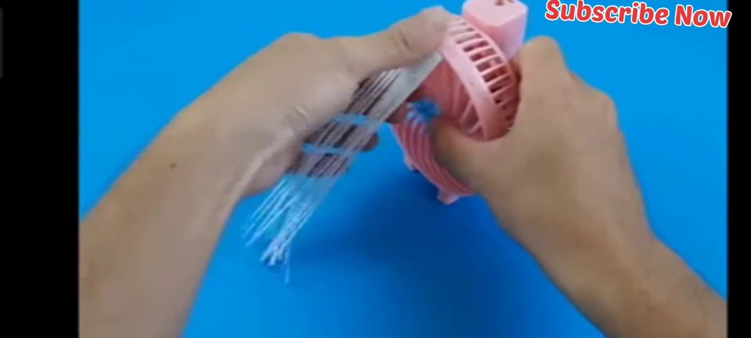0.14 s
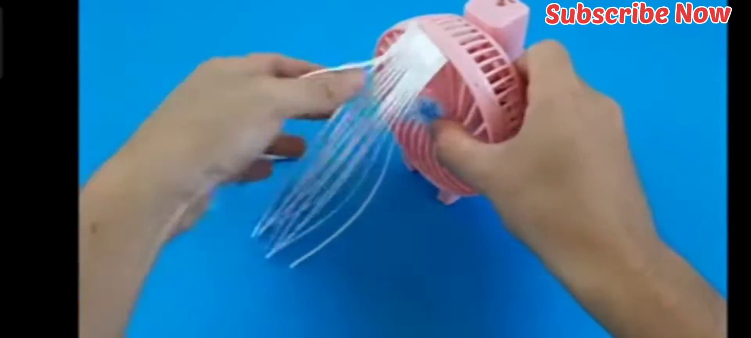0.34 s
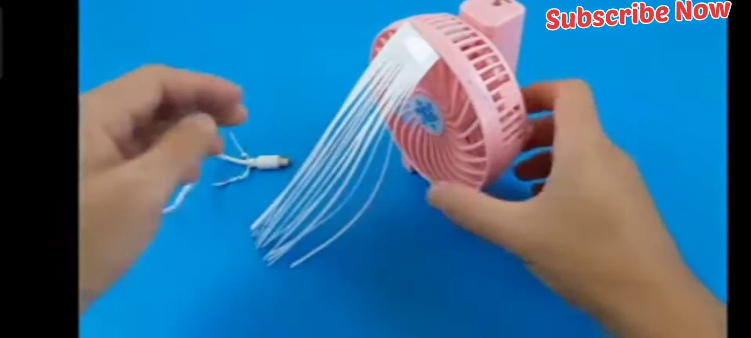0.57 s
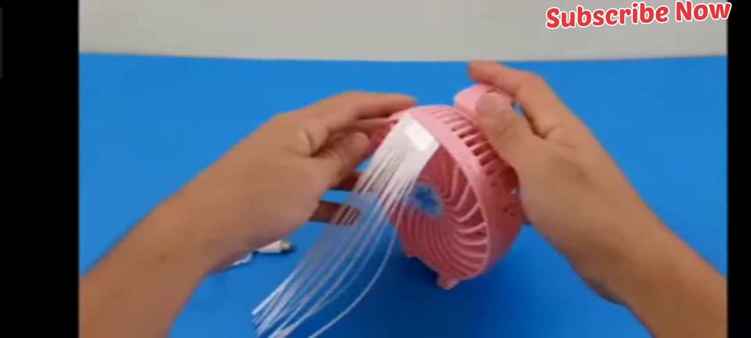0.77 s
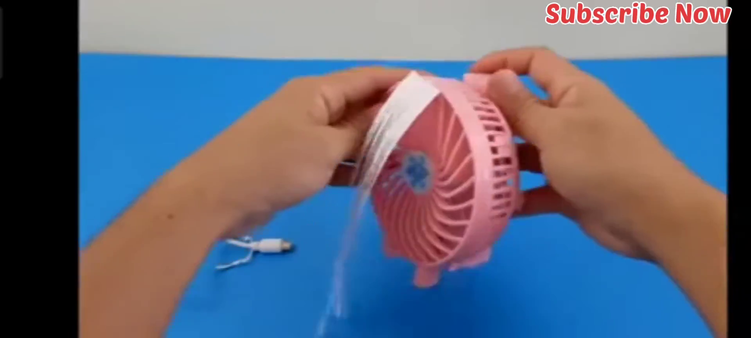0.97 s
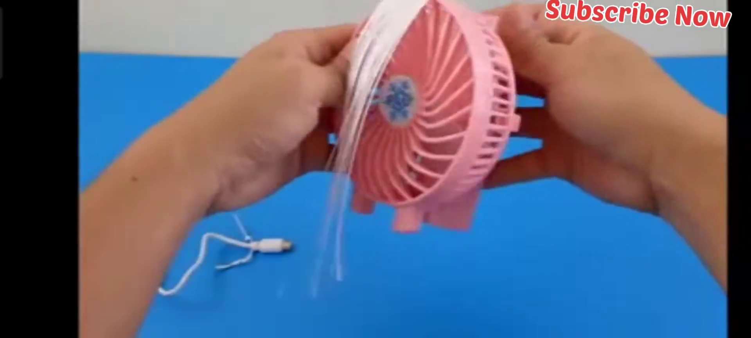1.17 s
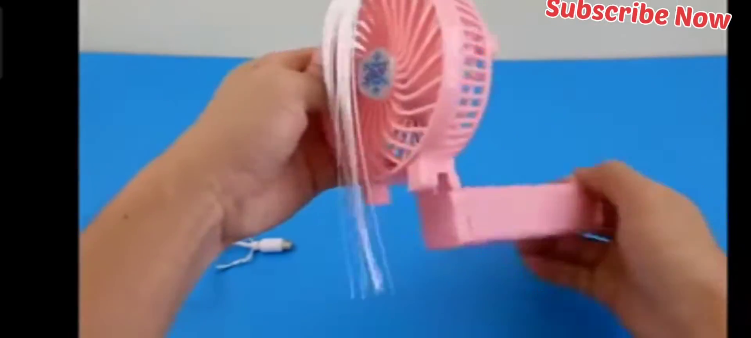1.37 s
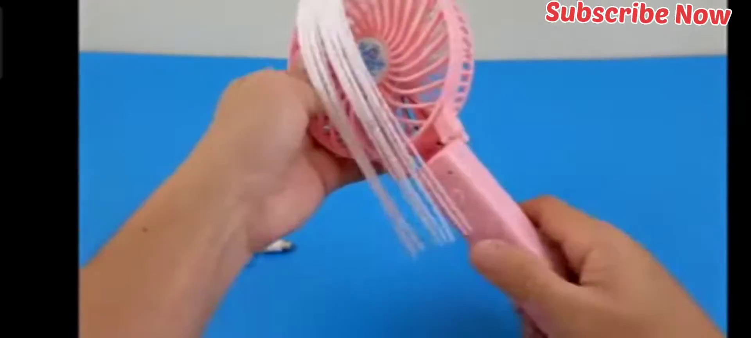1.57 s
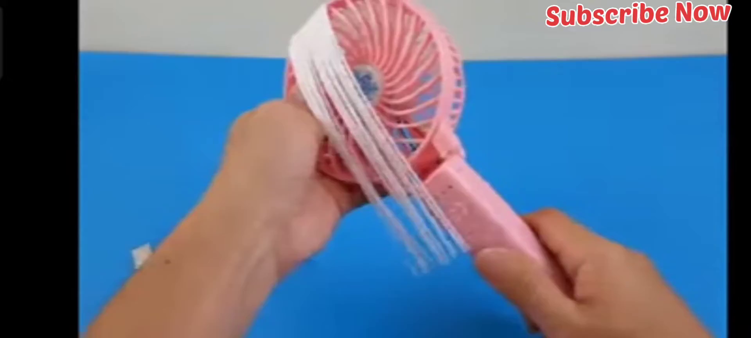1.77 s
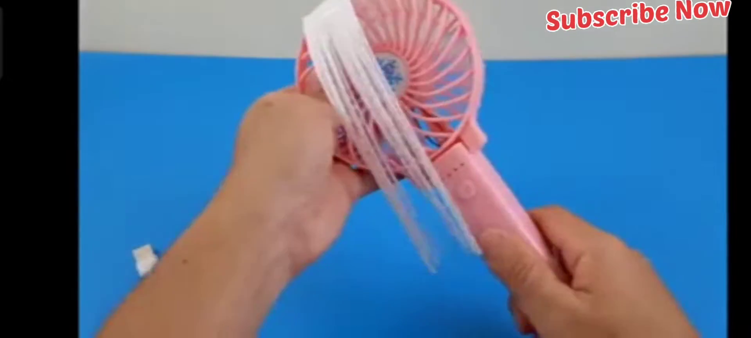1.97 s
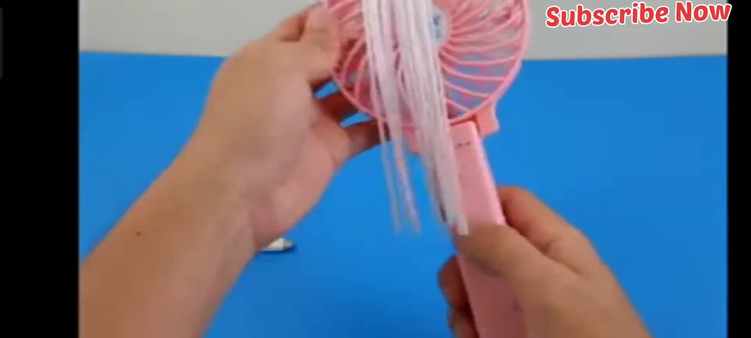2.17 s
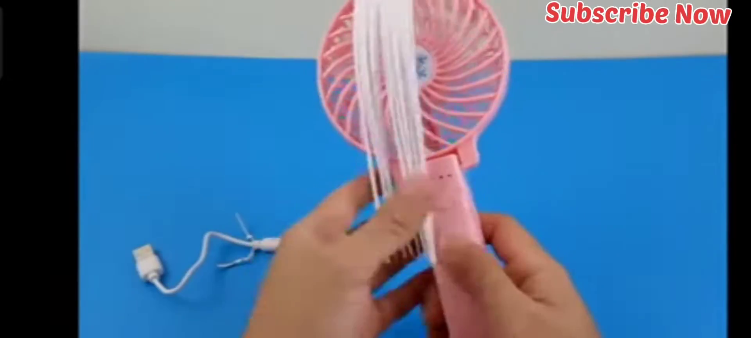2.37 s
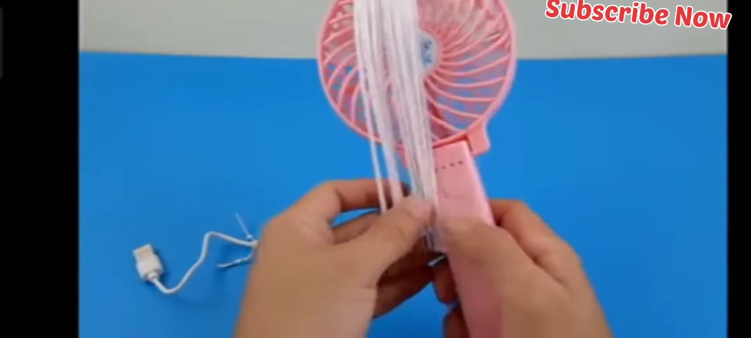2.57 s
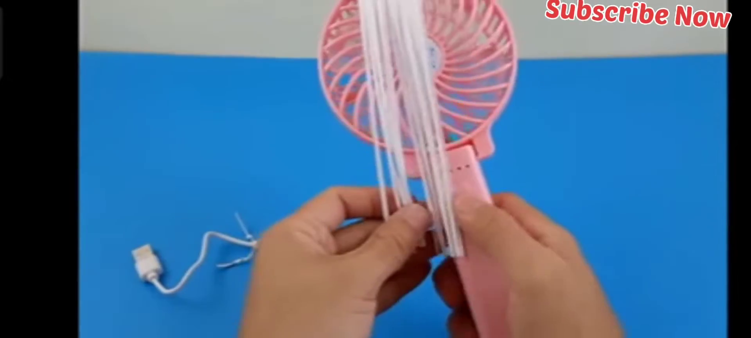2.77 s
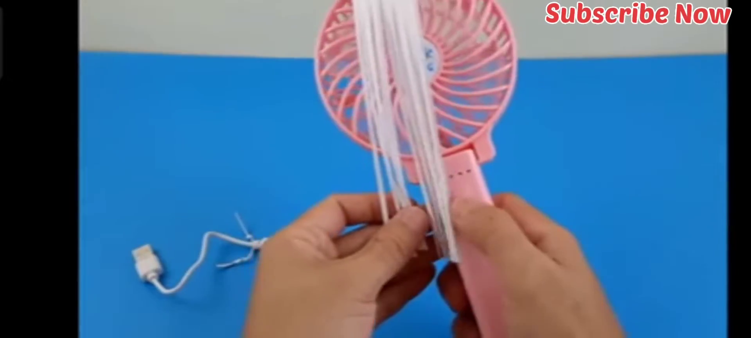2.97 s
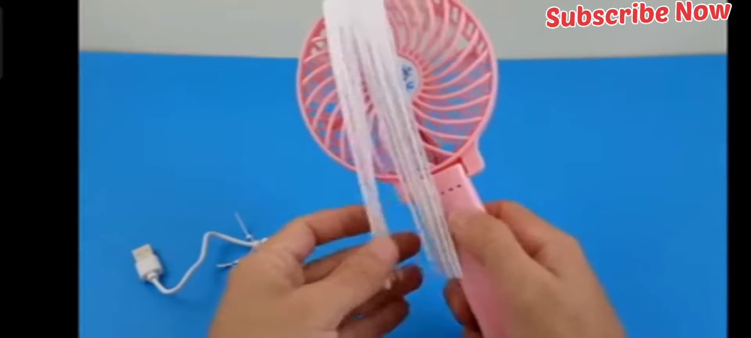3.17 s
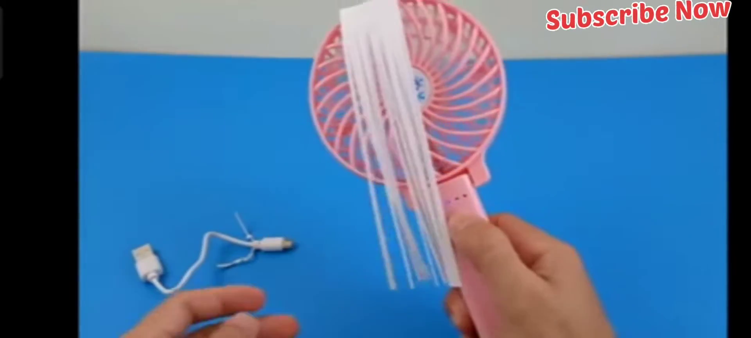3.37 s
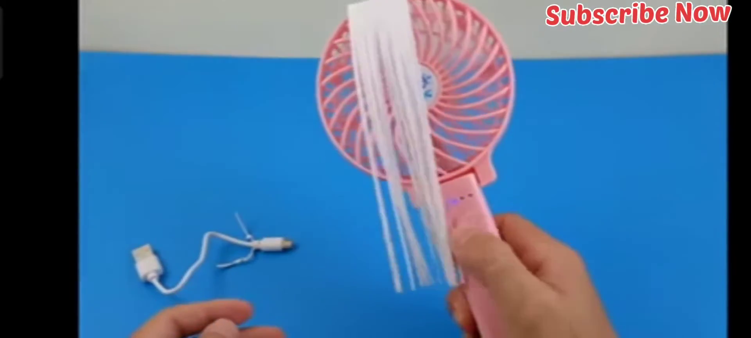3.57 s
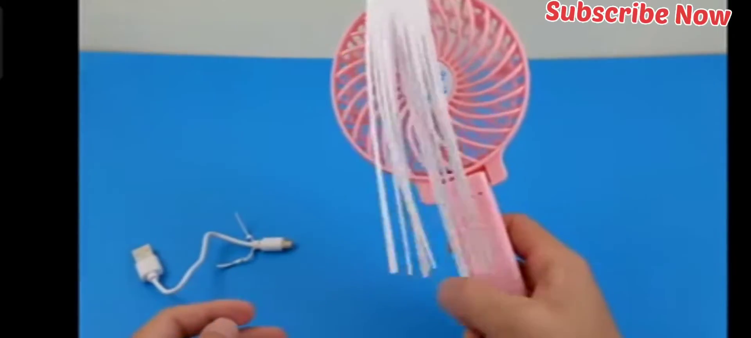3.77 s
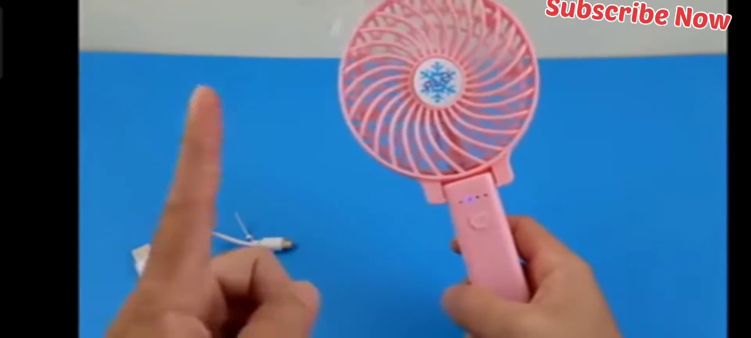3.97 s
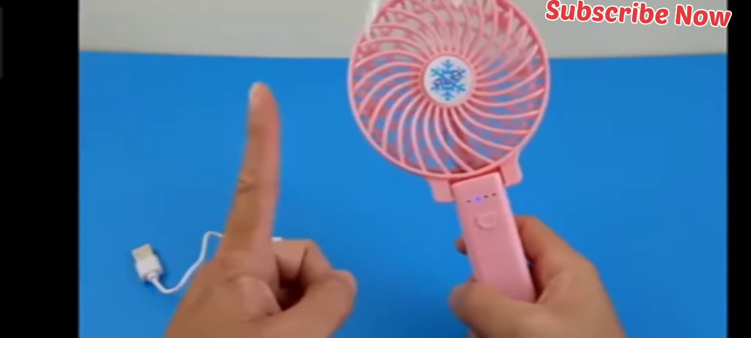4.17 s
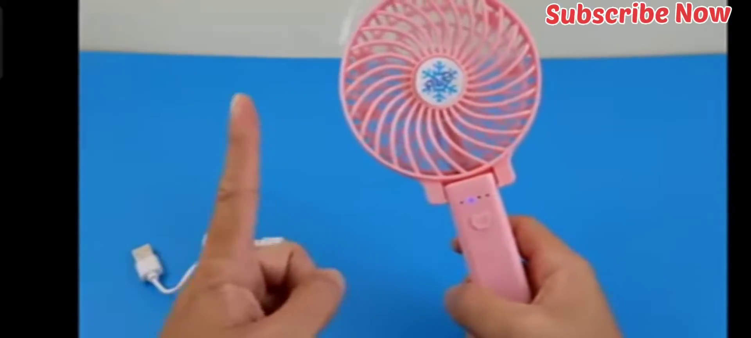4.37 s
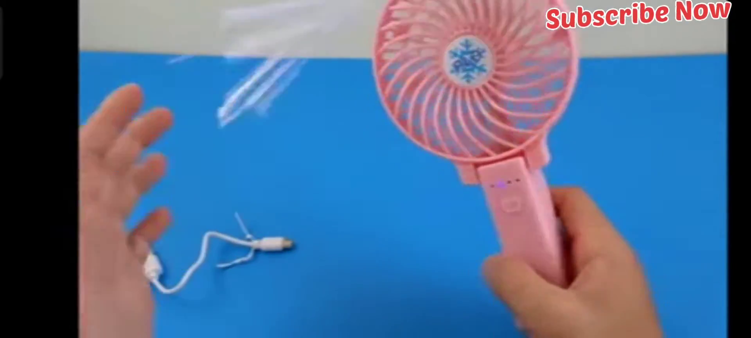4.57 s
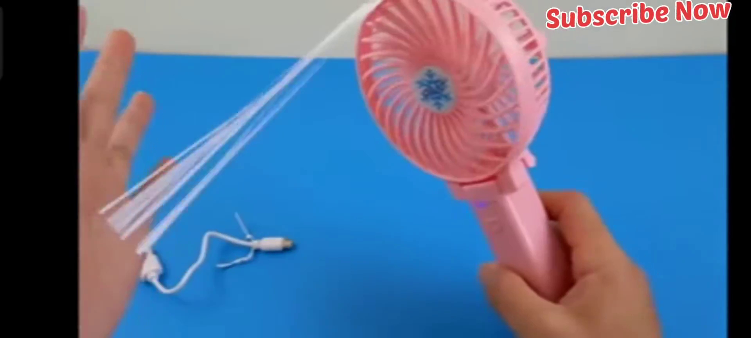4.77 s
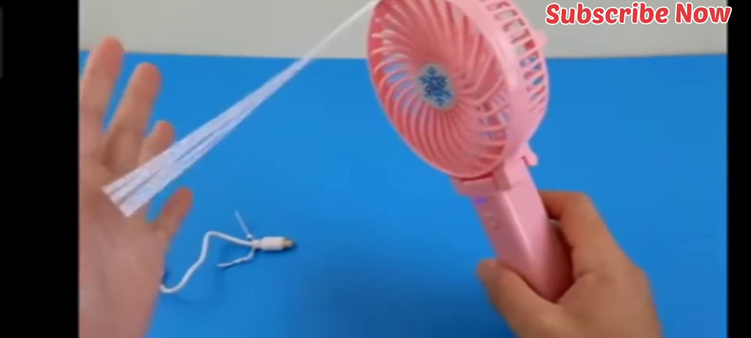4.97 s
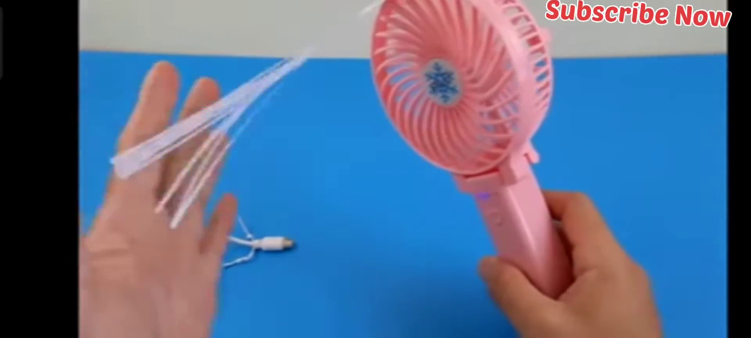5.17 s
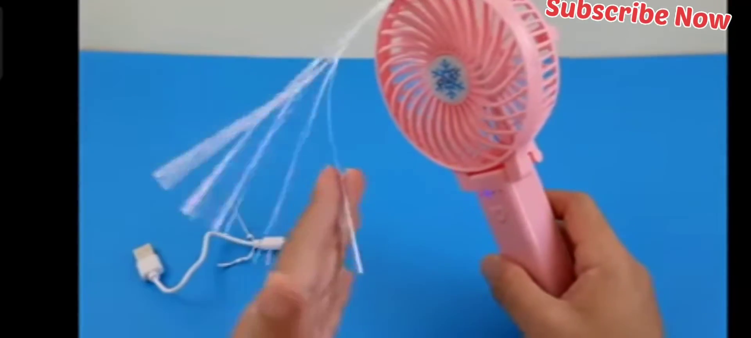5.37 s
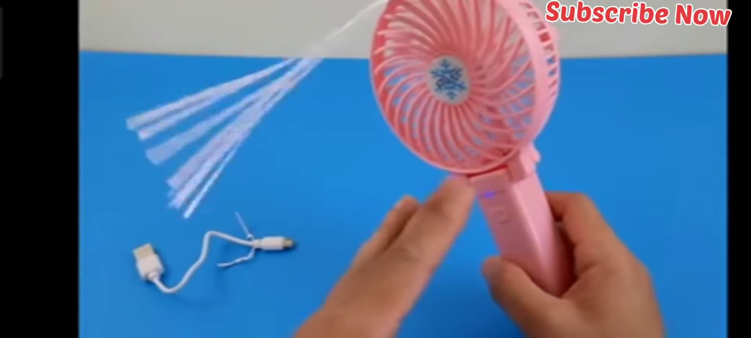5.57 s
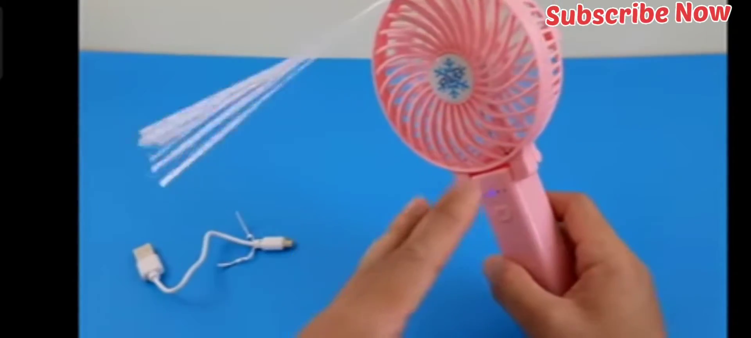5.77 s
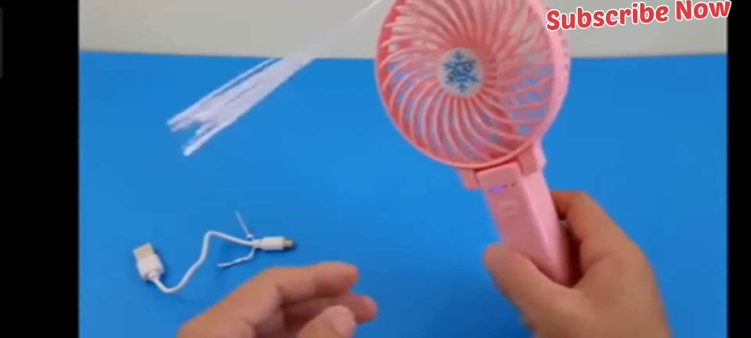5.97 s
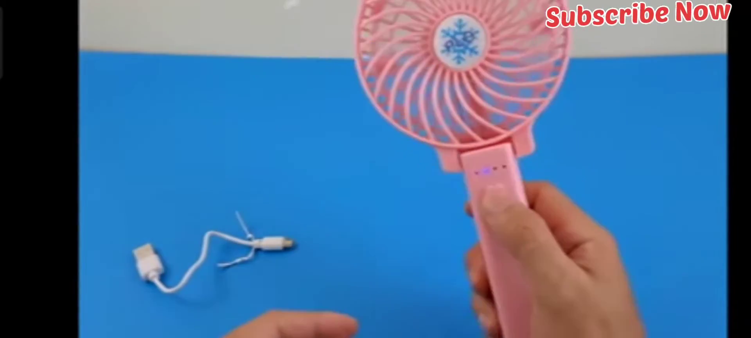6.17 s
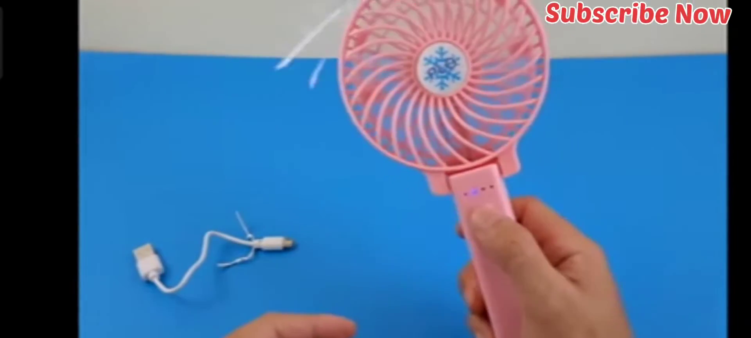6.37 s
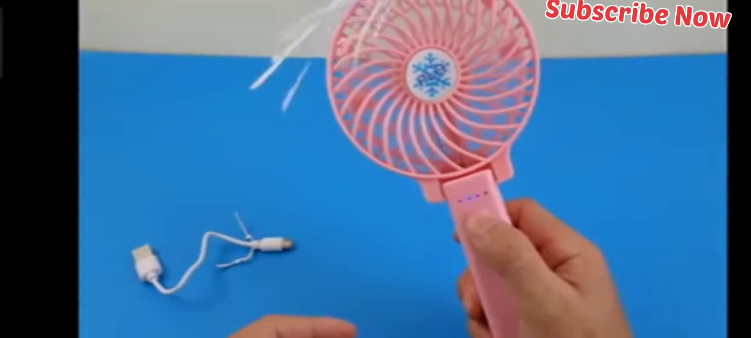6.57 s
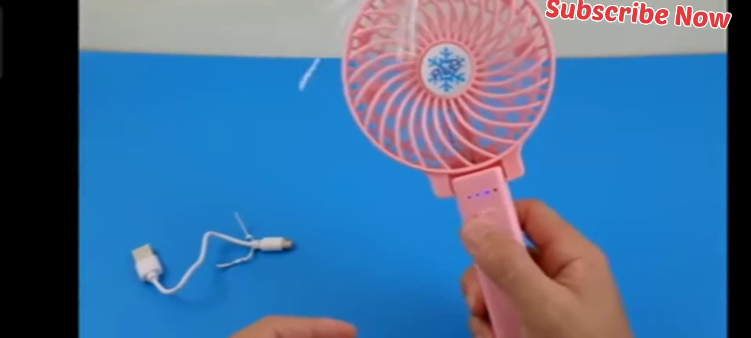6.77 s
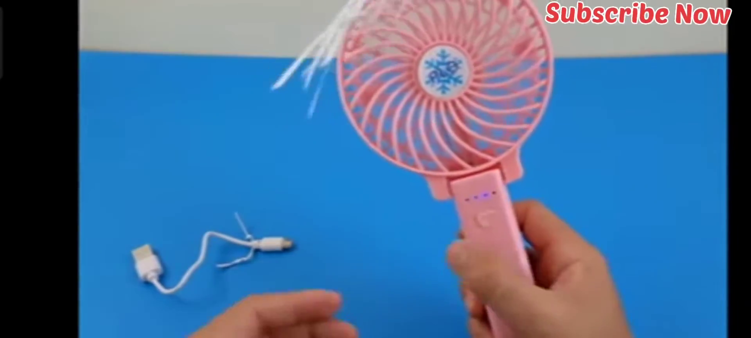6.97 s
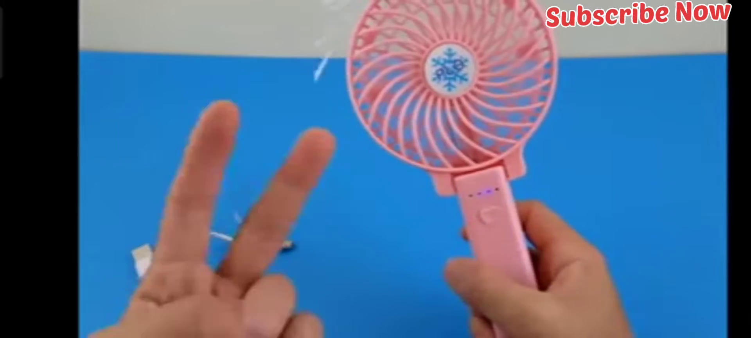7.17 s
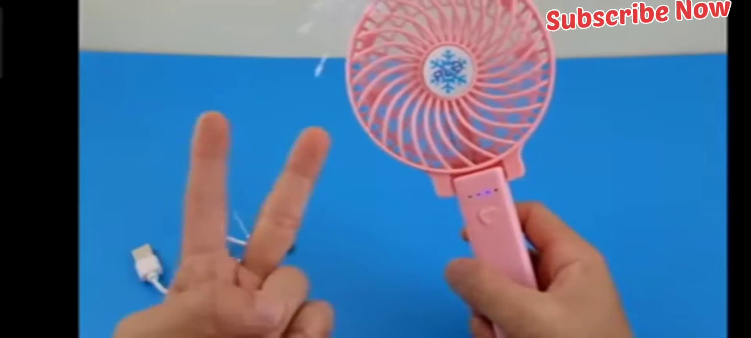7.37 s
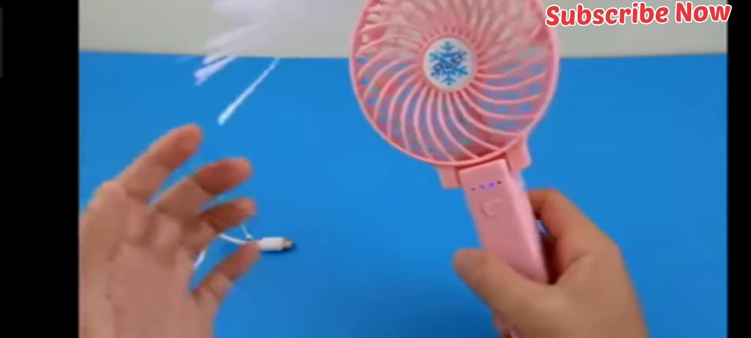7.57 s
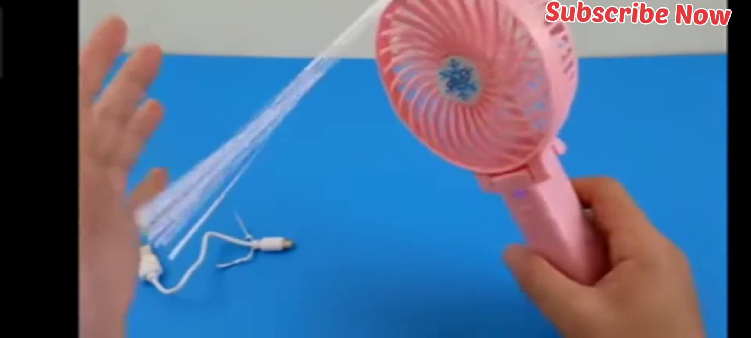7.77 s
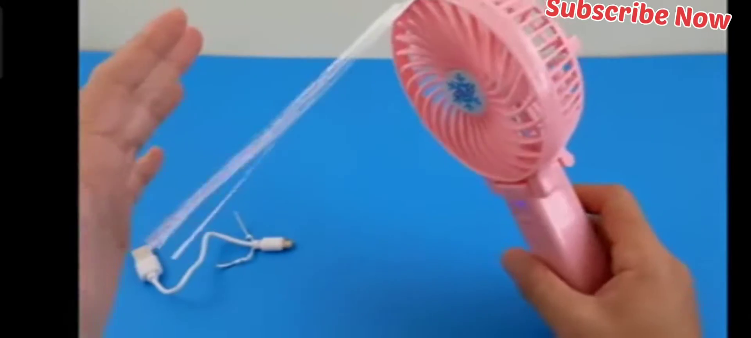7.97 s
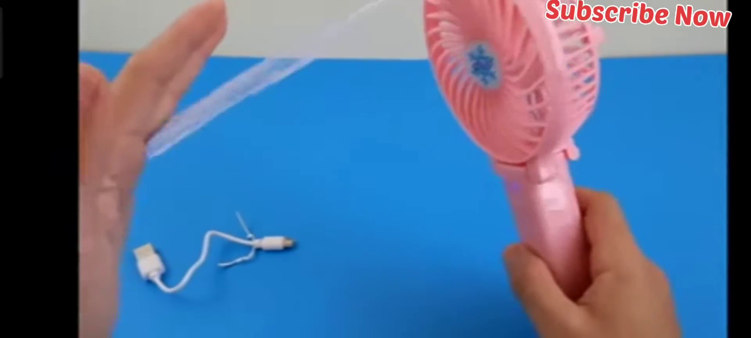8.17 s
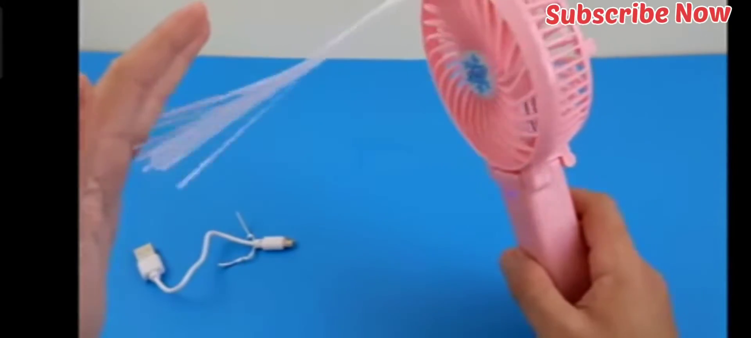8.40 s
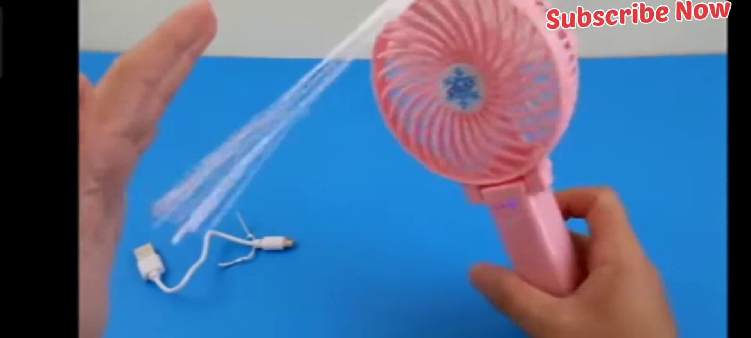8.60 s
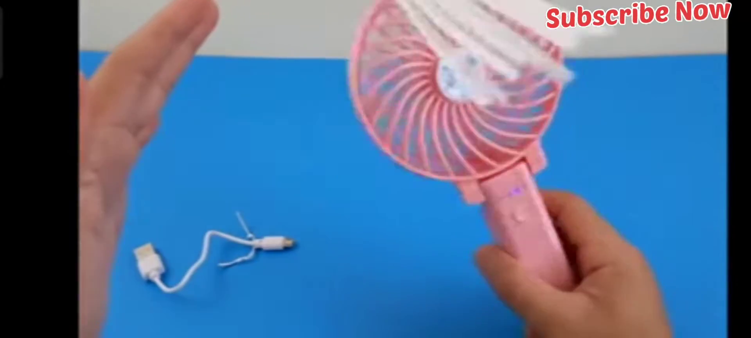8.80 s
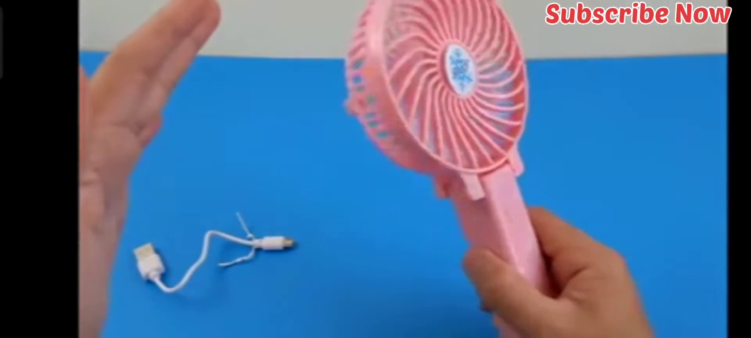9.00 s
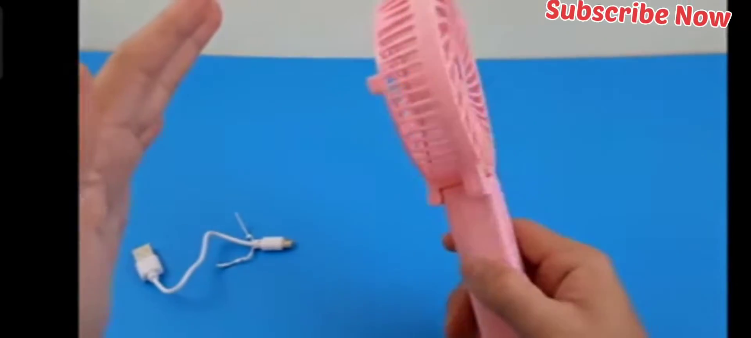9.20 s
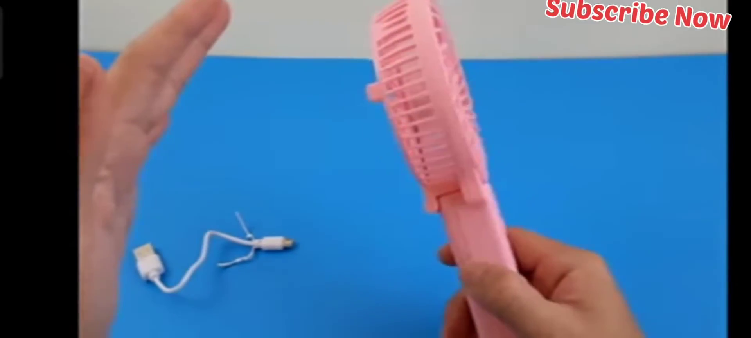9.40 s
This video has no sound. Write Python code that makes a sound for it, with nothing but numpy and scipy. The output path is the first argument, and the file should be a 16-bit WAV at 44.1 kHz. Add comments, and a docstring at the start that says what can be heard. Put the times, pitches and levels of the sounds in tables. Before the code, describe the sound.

Close up in a quiet room, fingers swish and tick over a light plastic fan with soft table thumps. The handle snaps open with a sharp, loud crack. After a quiet pause a button clicks and a small motor spins up quickly into a buzzing whir with airy rush. A second, harder click makes it slightly higher and faster, and turning the fan makes its tone swell, dull and fade.

```python
"""A quiet room with a small plastic hand fan close to a mono microphone. Hands rub it in strokes of noise, bump
the table with soft thumps and snap its handle open with sharp, ringing hits. A button click starts the motor,
which spins up as a stack of tones, brush buzz and air noise; a second click speeds it up. The fan is turned this
way and that, so its tones and air rush swell and fade. A low rumble and a faint hiss lie underneath."""
import sys
import numpy as np
from scipy import signal
from scipy.fft import rfft, irfft, next_fast_len
from scipy.io import wavfile
from scipy.ndimage import uniform_filter1d, map_coordinates

SR = 44100
rng = np.random.default_rng(int(sys.argv[2]) if len(sys.argv) > 2 else 0)


def to_wav(sig):
    """Store sig (one row per channel, or 1-D mono) as 16-bit WAV at the path in sys.argv[1].

    Samples outside -1..1 are clipped; the rate is SR.
    """
    pcm = np.clip(np.atleast_2d(sig), -1, 1) * 32767
    pcm = np.round(pcm).astype(np.int16)
    wavfile.write(sys.argv[1], SR, pcm.T)  # frames by channels


def how_loud(loudness_db):
    """Turn decibels into a plain amplitude multiplier (0 dB gives 1, 20 dB gives 10)."""
    steps = np.asarray(loudness_db, float) / 20
    return 10 ** steps


N = 416304
T = np.arange(N) / SR  # time of each sample in seconds

# speed steps of the motor: start_s, pulse_rate_change_hz, time_constant_s
SPEED_STEPS = [(3.338, 181.7, .326), (6.44, 22.1, .235), (8.35, -1.7, .3)]
# how the fan is held: time_s, aim (0 facing, 1 side-on, 2 back to the microphone), overall_change_db,
# then changes to three multiples of the pulse rate: second_change_db, seventh_change_db, sixth_change_db
AIM = [(3.4, 0.47, 7, 1, 18, 2), (3.58, -0.42, -3, 14, 16, .1), (3.74, 1, -1, 2.5, 4, .1),
       (3.9, -0.27, -1.5, 7.5, 3, 4), (4.3, 0.02, 0.5, 3, 4, -2.5), (4.6, 0.53, 0.5, 5, 2, 1),
       (5.0, 0.46, 0, -1, 0, 2.5), (5.4, 0.72, 1, -5, -0.5, 1), (5.8, 0.4, 0.5, -0.5, 0, -1),
       (6.3, 0.46, 0, -2, -2.5, -1), (6.6, -0.058, 1, 2, -1.5, -2), (6.9, 0.12, 2, -1, -6.5, 0.5),
       (7.3, 0.27, 1, 3, 0.5, 2), (7.6, 0.43, 0.5, 3.5, -7, 1), (7.85, 1.14, 1.5, 2.5, -6, -6),
       (8.06, 0.95, -2, 4, -11, -12), (8.25, 1.11, -1.5, 1.5, -4.5, -3), (8.5, 0.56, 1, 3, -9, 5.5),
       (8.75, 1.28, 1, 2, -6, 10), (9.0, 1.43, -3.5, -6.5, -1, 5.5), (9.44, 2.45, 1.5, 4, -5, -4)]
# strong multiples of the pulse rate, before the changes in AIM:
# multiple, low_speed_db, high_speed_db, side_on_change_db, from_behind_change_db
STRONG_TONES = [(1, -42.5, -39.5, -4, -6.5), (2, -46, -40, -1.5, -14.5), (3, -41, -43.5, -4, -13.5),
                (6, -52, -46.5, -17, -9.5), (7, -38, -41.5, -6.5, -19), (9, -58.5, -54, -9.5, -5.5),
                (14, -65, -61.5, 2.5, -8.5)]
# weaker multiples: multiple, multiple_it_follows, average_level_from_that_one_db
WEAK_TONES = [(4, 3, -9.5), (5, 6, -1.5), (8, 9, -3.5), (11, 14, -5.5), (12, 14, -4.5), (13, 14, -3.5),
              (15, 14, -2), (16, 14, -8)]
# main air rush, its low part and its fizz, before the changes in AIM: low_speed_db, high_speed_db,
# side_on_change_db, from_behind_change_db, growth_db_per_octave_of_speed
RUSH, LOW_RUSH, FIZZ = (-52, -50, -1, -5, 36), (-44.5, -46, 0, -7.5, 20), (-59.5, -59.5, 3.5, -8, 24)
# colour of the blade and grille rush: frequency_hz, density_db_per_hz
AIR_COLOUR = [(120, -8), (200, -6.5), (236, -12), (305, -8.5), (380, -7), (424, -9), (558, -8.5),
              (1000, -15.5), (1250, -9.5), (1530, -17), (1870, -16.5), (2380, -14.5), (4430, -26.5),
              (14600, -41.5), (16000, -52)]
# colour of the airflow reaching the microphone: frequency_hz, density_db_per_hz
DRAUGHT_COLOUR = [(12, -30), (22, -4), (36, 7), (60, 5), (110, -48)]
# housing resonances, before the grip shifts them: frequency_hz, width_hz, strength_db
HOUSING = [(600, 230, 1), (1250, 150, -8), (1890, 200, 0), (2350, 150, -4), (3030, 160, -8),
           (3480, 150, -6), (3720, 150, -8), (4160, 100, -15), (4700, 180, -11), (5320, 300, -14),
           (5800, 300, -17), (7450, 500, -20)]
# starting current shakes the housing: start_s, level_db, length_s
SURGE = [(3.47, -53, 0.57)]
# paper streamers flick the grille: start_s, level_db
STREAMER_FLICKS = [(4.321, -42), (8.372, -44)]
# finger strokes on plastic: start_s, skin_swish_db, hollow_scrape_db, length_s
FINGER_STROKES = [(0.079, -39, -67, 0.053), (0.148, -39.5, -69, 0.032), (0.194, -51.5, -70, 0.067),
                  (0.283, -54, -61, 0.052), (0.73, -48.5, -75, 0.041), (0.746, -48, -56, 0.045),
                  (1.196, -53.5, -85, 0.037), (1.262, -62, -53, 0.022), (1.285, -56.5, -53.5, 0.065),
                  (1.415, -61.5, -55, 0.038), (1.64, -52, -52, 0.026), (1.673, -52.5, -48.5, 0.07),
                  (1.817, -52.5, -70, 0.083), (1.939, -53.5, -69, 0.047), (2.206, -56.5, -81, 0.046),
                  (2.503, -54.5, -80, 0.038)]
# colour of skin on plastic: frequency_hz, density_db_per_hz
SWISH_COLOUR = [(1180, -46), (2000, -15), (3140, -10), (4010, -7.5), (5030, -1.5), (6760, -3), (7510, 0),
                (11400, 0.5), (16000, -10.5)]
# knocks on the housing: start_s, blow_peak_db, treble_db, favoured_hz, favour_db, rattle_s
KNOCKS = [(0.105, -42, 21, 6500, 12, .007), (0.175, -45, 19, 10600, 8, .006),
          (0.2215, -44, 19, 7000, 11, 0.0067), (0.2925, -37, 25, 10000, 15, .003),
          (0.602, -40, 18, 2580, 18, 0.0034), (0.737, -49.5, 15, 5000, 4, .004),
          (1.2005, -44.5, 23, 6500, 25, .002), (1.302, -44, 2, 1380, 12, 0.011),
          (1.4145, -29.5, -8.5, 1400, 15, 0.0075), (1.471, -46.5, 13, 4500, 10, 0.0044),
          (1.665, -4, -2.5, 840, 1.5, 0.01), (1.689, -23.5, -6.5, 1790, 10.5, 0.0053),
          (1.711, -35, -10.5, 800, 25, 0.016), (1.724, -38, -7, 1770, 24.5, .016),
          (1.879, -39.5, 16, 8800, -2, .003), (1.896, -38.5, 15, 1230, 9, .005),
          (2.568, -46, 16, 1240, 6, 0.0061), (3.392, -50, 7, 920, 15, 0.0087)]
# resonances of the struck housing: frequency_hz, width_hz, strength_db
STRUCK_HOUSING = [(447, 540, -4.5), (810, 620, -2), (1370, 325, 0), (1850, 300, -5), (2390, 250, -8.5),
                  (3500, 1100, -11.5), (5900, 1400, -9.5), (7350, 700, -8), (8850, 1000, -7),
                  (12000, 2500, -19)]
# what lingers after a hit, before the ring level is added: frequency_hz, level_db, time_to_fall_60_db_s
RING = [(505, -10, 0.15), (840, -6.5, 0.22), (960, -2.5, 0.14), (1244, -12, 0.17), (1783, -2, 0.22),
        (1960, -7.5, 0.21)]
# button presses: start_s, blow_peak_db, treble_db, favoured_hz, favour_db, rattle_s
BUTTON_PRESSES = [(3.2695, -18, 0, 1890, 1.3, 0.0073), (6.3885, -8, 0, 7500, 2.3, 0.0054)]
# button resonances: frequency_hz, width_hz, first_press_db, second_press_db
BUTTON = [(1120, 720, -10.5, -25), (1890, 270, -4, -8), (2570, 260, -5.5, -5.5), (3660, 350, -6.5, -8.5),
          (5430, 1700, -11.5, -12), (6080, 302, -1.5, -21), (6820, 160, -2.5, -6), (7510, 260, -6, -2.5),
          (8400, 400, -12.5, -22), (9330, 300, -5.5, -19), (9770, 240, -4.5, -12.5), (11300, 650, -18, -19)]
# dull low thumps, probably hands on the table and handle: start_s, level_db, upper_body_change_db, length_s
THUMPS = [(0.228, -37.5, -14, 0.048), (0.253, -29, -10.5, 0.07), (0.296, -42, -2, 0.038),
          (0.34, -46.5, -1, 0.042), (0.712, -33.5, -16, 0.035), (0.76, -30, -15, 0.027),
          (5.124, -32.5, -23, 0.13), (5.7, -31, -16, 0.035), (8.118, -34, -17, 0.099),
          (8.218, -36, -18, 0.098), (8.956, -38.5, -8.5, 0.24)]
# thump resonances, two low and then two upper: frequency_hz, width_hz, strength_db
THUMP_BODY = [(139.3, 31.5, 1.5), (206, 170, -7), (380, 65, 7.5), (880, 1050, -4.5)]
# how long the room's answer lasts: frequency_hz, time_to_fall_60_db_s
ROOM_DECAY = [(200, 0.25), (8000, 0.25), (14000, 0.24)]
# the low rumble over time: time_s, deep_db, upper_db
RUMBLE_LEVELS = [(0.0, -50, -42), (0.15, -45.5, -47.5), (1.21, -52, -53), (1.65, -43.5, -46.5),
                 (1.81, -54.5, -53), (2.65, -43.5, -52.5), (2.81, -55, -56), (3.5, -49.5, -53.5),
                 (3.92, -52.5, -50.5), (4.81, -55, -53.5), (5.57, -45.5, -46.5), (7.6, -49, -51),
                 (8.41, -46.5, -45), (9.44, -53.5, -54)]
# colours of the deep and upper rumble: frequency_hz, density_db_per_hz
DEEP_COLOUR, UPPER_COLOUR = [(18, -18), (38, -6), (54, 7.5), (70, 9.5), (110, -8), (140, -39), (240, -120)], [(53, -29), (90, -6.5), (129, -4.5), (237, -12.5), (298, -18),
                                           (520, -32.5), (680, -69), (1140, -120)]
# room and microphone floor: frequency_hz, density_db_per_hz
HISS_COLOUR = [(250, -47), (420, -17), (536, -6.5), (578, -9.5), (821, -12), (941, -15), (1060, -15),
               (4380, -21), (5260, -14.5), (16000, -10)]


def fan():
    """A spinning motor drives tones, air noise and brush buzz, all changing with speed and aim."""
    aim, near_db, second_db, seventh_db, sixth_db = curves(AIM)
    rate_hz = pulse_rate()
    phase = 2 * np.pi * np.cumsum(rate_hz * (1 + 0.0014 * wobble(25))) / SR
    low_speed_hz, speed_up_hz = SPEED_STEPS[0][1], SPEED_STEPS[1][1]
    octaves_slow = np.log2(np.clip(rate_hz / low_speed_hz, 1e-3, 1))  # 0 at low speed, negative below
    fast = np.clip((rate_hz - low_speed_hz) / speed_up_hz, 0, 1)

    def level(low_db, high_db, side_db, back_db, growth_db):
        """Level in dB as the fan spins up, changes speed and turns."""
        speed_db = low_db + fast * (high_db - low_db) + growth_db * octaves_slow
        return speed_db + np.interp(aim, (0, 1, 2), (0, side_db, back_db)) + near_db

    air_db = level(*RUSH)
    tones = motor_tones(phase, octaves_slow, level, {2: second_db, 6: sixth_db, 7: seventh_db})
    running = tones + air_rush(phase, air_db, level) + brush_buzz(phase, air_db) + starting_whine()
    fade_in = np.clip((T - AIM[0][0]) / 0.081, 0, 1)
    return fade_in * running + streamer_flicks()


def pulse_rate():
    """Each speed step bends the motor's pulse rate (Hz) quickly at first, then ever more slowly."""
    return sum(step_hz * (1 - np.exp(-np.maximum(T - s, 0) / lag)) for s, step_hz, lag in SPEED_STEPS)


def motor_tones(phase, octaves_slow, level, extra_db):
    """Sine tones sit at whole multiples of the motor's pulse rate."""
    levels = {}
    for k, *row in STRONG_TONES:
        growth_db = 13 + 14.5 * np.log2(k)  # per octave of speed; high tones grow more
        levels[k] = level(*row, growth_db) + extra_db.get(k, 0)
    for k, leader, db in WEAK_TONES:
        levels[k] = levels[leader] + db + 2.8 * wobble(2.6)
    # turbulent inflow makes each tone waver in strength and phase on its own,
    # the high ones most; the phase wavers more while the motor is still slow
    looseness = 1 + 4 * octaves_slow ** 2
    tones = np.zeros(N)
    for k, db in levels.items():
        strength = np.sqrt(2) * how_loud(db + (0.62 + 0.1 * k) * wobble(22))
        waver = (0.18 + 0.046 * k) * looseness * wobble(30)
        tones += strength * np.sin(k * phase + waver + k * k)
    return tones


def air_rush(phase, air_db, level):
    """Blades and grille make patchy noise that throbs with the pulses; a draught rumbles at the microphone."""
    rush = how_loud(air_db) * noise(AIR_COLOUR, patchy_db=3.0, lo_hz=1540, hi_hz=7860)
    low_rush = how_loud(level(*LOW_RUSH)) * noise(AIR_COLOUR, patchy_db=2.5, hi_hz=1400)
    flicker_db = 2.2 * wobble(45)
    fizz = how_loud(level(*FIZZ) + flicker_db) * noise(AIR_COLOUR, patchy_db=1.5, lo_hz=7340)
    draught = how_loud(air_db - 3.5 + 3.1 * wobble(4.5)) * noise(DRAUGHT_COLOUR)
    return (rush + low_rush + fizz) * (1 + 0.027 * np.cos(phase)) + draught


def brush_buzz(phase, air_db):
    """Brush noise pulses with the motor and sounds through the housing resonances."""
    brushes = rng.standard_normal(N) * np.exp(0.45 * np.cos(phase))

    def shifted(ratio):
        """Brush noise through resonances moved by one ratio."""
        return filtered(brushes, resonant([(hz * ratio, w, db) for hz, w, db in HOUSING]))

    # the grip on the housing shifts its resonances: a blend of a lower and a higher set
    grip = np.pi / 4 * (1 + np.tanh(wobble(1.5)))
    shift = 0.012  # share of the resonance frequency
    buzz = unit(np.cos(grip) * shifted(1 - shift) + np.sin(grip) * shifted(1 + shift))
    # while still slow the motor draws most current and shakes only the lower housing resonances
    surge = strokes(SURGE) * unit(filtered(buzz, resonant(HOUSING[:4])))
    return how_loud(air_db + 1.5 + 1.3 * wobble(8.9)) * buzz + surge


def starting_whine():
    """A thin, unsteady whine sags in pitch as the motor starts."""
    start_s, level_db, length_s = 3.485, -56.5, 0.16
    start_hz, sag_hz_per_s = 6500, 800
    hz = start_hz - sag_hz_per_s * np.clip(T - start_s, 0, 1) + 70 * wobble(150)
    envelope = strokes([(start_s, level_db, length_s)]) * how_loud(4.5 * wobble(78))
    return envelope * np.sin(2 * np.pi * np.cumsum(hz) / SR)


def streamer_flicks():
    """Paper streamers flick the grille in very short bursts of bright noise."""
    return strokes([(s, db, 0.004) for s, db in STREAMER_FLICKS]) * noise(SWISH_COLOUR)


def hands():
    """Skin slips over plastic in grainy strokes, bright on the surface and hollow through the housing."""
    swish = strokes([(s, db, length) for s, db, _, length in FINGER_STROKES])
    scrape = strokes([(s, db, length) for s, _, db, length in FINGER_STROKES])
    grains = rng.standard_normal(N) * how_loud(4 * wobble(250))
    hollow = filtered(filtered(grains, resonant(STRUCK_HOUSING)), resonant([(1450, 940, 0.1)]))
    skin = unit(noise(SWISH_COLOUR, patchy_db=3.0) * how_loud(3.7 * wobble(300)))
    skin = skin + how_loud(-9) * squeaks(count=3000)
    return swish * unit(skin) + scrape * unit(hollow)


def squeaks(count):
    """Brief slips of skin make pitched grains at random moments and pitches; together they have rms 1."""
    low_hz, high_hz, decay_s = 2400, 12000, 0.005
    when, pitch, size = rng.random((count, 3)).T[:, :, None]
    t = T[:SR // 30]
    hz = low_hz * (high_hz / low_hz) ** pitch
    envelope = (1 - np.exp(-t / 0.001)) * np.exp(-t / decay_s)
    grains = how_loud(10 * size + along(SWISH_COLOUR, hz)) * np.sin(2 * np.pi * hz * t) * envelope
    at = (when * (N - len(t))).astype(int) + np.arange(len(t))
    return unit(np.bincount(at.ravel(), grains.ravel(), N))


def knocks():
    """Hard contacts set the plastic housing ringing."""
    return hits(KNOCKS, STRUCK_HOUSING, rattle_db=-18.5, ring_db=-26.5)


def button_clicks():
    """The button's small parts strike and rattle, with other resonance strengths in each press."""
    out = np.zeros(N)
    for k, press in enumerate(BUTTON_PRESSES):
        peaks = [(hz, w, db[k]) for hz, w, *db in BUTTON]
        out += hits([press], peaks, rattle_db=-27.5, ring_db=-47.0)
    return out


def hits(events, peaks, rattle_db, ring_db):
    """Each hit is a lead-in scrape, one sharp blow, a weaker rattle into the resonances, and a faint ring."""
    out, t = np.zeros(N + SR), np.arange(SR // 4) / SR
    lead = round(SR / 300)  # samples of scrape ahead of the blow
    for s, db, treble_db, hz, favour_db, rattle_s in events:
        fall = np.exp(-0.9 * t / rattle_s - (t / (1.3 * rattle_s)) ** 5)
        rattle = how_loud(rattle_db + 5.1 * rng.standard_normal(len(t))) * rng.standard_normal(len(t)) * fall
        rattle[0] = -1  # the sharp blow itself
        scrape = how_loud(rattle_db - 12.0) * rng.standard_normal(lead)
        contacts = np.append(scrape, rattle[:-lead])
        favour = resonant([(hz, 0.15 * hz, favour_db)])

        def tilt(f):
            """Where the blow lands tips the treble and favours one region."""
            treble = (1 + how_loud(treble_db) * 1j * f / 3000) / (1 + 1j * f / 3000)
            return treble * (1.5 + favour(f))

        blow = filtered(filtered(contacts, resonant(peaks)), tilt)
        ring = lingering_ring(t, ring_db) * (1 - np.exp(-t / 0.008))
        out[round(s * SR) - lead:][:len(t)] += how_loud(db) * (blow / np.abs(blow).max() + ring)
    return out[:N]


def lingering_ring(t, ring_db):
    """Dying tones flutter in level and phase as loose parts keep touching."""
    ring = np.zeros(len(t))
    for hz, db, t60 in RING:
        strength = how_loud(db + ring_db + 4.3 * flutter(t) - 60 * t / t60)
        ring += strength * np.sin(2 * np.pi * hz * t + 0.55 * flutter(t) + 2 * np.pi * rng.random())
    return ring


def thumps():
    """Soft contacts shake a low body resonance, and more briefly its upper ones."""
    low = strokes([(s, db, length) for s, db, _, length in THUMPS])
    upper = strokes([(s, db + upper_db, 0.59 * length) for s, db, upper_db, length in THUMPS])

    def body(peaks):
        """Noise passed twice through the resonances, rms 1."""
        return unit(filtered(filtered(rng.standard_normal(N), resonant(peaks)), resonant(peaks)))

    return low * body(THUMP_BODY[:2]) + upper * body(THUMP_BODY[2:])


def room(x):
    """The room answers after a short delay, and each frequency of the answer dies at its own speed."""
    hz, t, z = signal.stft(rng.standard_normal(SR // 2), SR, nperseg=256)
    fall = how_loud(-60 * t / along(ROOM_DECAY, hz)[:, None])
    tail = signal.istft(z * fall, SR, nperseg=256)[1]
    delayed = np.pad(x, (round(0.014 * SR), 0))
    return signal.fftconvolve(delayed, tail / np.linalg.norm(tail))[:N]


def rumble_and_hiss():
    """Low rumble in two layers of changing level lies over a slightly patchy hiss."""
    deep_db, upper_db = curves(RUMBLE_LEVELS)
    deep = how_loud(deep_db) * noise(DEEP_COLOUR)
    upper = how_loud(upper_db) * unit(noise(UPPER_COLOUR) * how_loud(2.6 * wobble(22)))
    hiss = how_loud(-60.5 + 1.3 * wobble(25)) * noise(HISS_COLOUR, patchy_db=1.8)
    return deep + upper + hiss


def strokes(rows):
    """Envelope of (start_s, level_db, length_s) events: a quick rise and a fall over the length."""
    out, t = np.zeros(N + SR), T[:SR]
    for s, db, length in rows:
        rise = 1 - np.exp(-t / (0.32 * length))
        out[round(s * SR):][:len(t)] += how_loud(db) * rise * np.exp(-(t / length) ** 2)
    return out[:N]


def noise(spectrum, patchy_db=0., lo_hz=0, hi_hz=SR):
    """Coloured noise of rms 1, patchy over time and frequency, between soft band edges."""
    z = signal.stft(rng.standard_normal(N), nperseg=512)[2]
    field = uniform_filter1d(rng.standard_normal(z.shape), size=7, axis=0)
    field = uniform_filter1d(field, size=6, axis=1)
    patchy = signal.istft(z * how_loud(patchy_db * unit(field)), nperseg=512)[1][:N]

    def colour(hz):
        """Wanted spectrum times the soft band edges."""
        edges = np.sqrt(hz ** 4 / (hz ** 4 + lo_hz ** 4 + 1) / (1 + (hz / hi_hz) ** 4))
        return how_loud(along(spectrum, hz)) * edges

    return unit(filtered(patchy, colour))


def resonant(peaks):
    """Response of (frequency_hz, width_hz, strength_db) resonances, added with alternating sign."""
    def response(f):
        """Sum of the resonances at frequency f."""
        total = 0
        for k, (hz, width, db) in enumerate(peaks):
            damping = 1j * f * width
            total = total + (-1) ** k * how_loud(db) * damping / (hz * hz - f * f + damping)
        return total
    return response


def filtered(x, response):
    """Multiplies the spectrum of x by a response of frequency."""
    m = next_fast_len(len(x) + 8192)
    return irfft(rfft(x, m) * response(np.fft.rfftfreq(m, 1 / SR)), m)[:len(x)]


def wobble(rate):
    """A smooth random curve with rate random points a second."""
    coarse = T[::32]
    points = rng.standard_normal(int(N * rate / SR) + 4)
    return np.interp(T, coarse, map_coordinates(points, [coarse * rate]))


def flutter(t):
    """A quick random curve over the short times t, 90 random points a second."""
    return np.interp(t, np.arange(30) / 90, rng.standard_normal(30))


def curves(rows):
    """One value per sample for each column after the time."""
    s, *columns = np.transpose(rows)
    return [np.interp(T, s, column) for column in columns]


def along(points, hz):
    """Reads (frequency_hz, value) points on a log frequency axis."""
    f, v = np.transpose(points)
    return np.interp(np.log(hz + 1), np.log(f + 1), v)


def unit(x):
    """Scales x to rms 1."""
    return x / np.sqrt(np.mean(x ** 2) + 1e-20)


def scene():
    """All sources add up at one microphone; the knocks and clicks also excite the room."""
    sharp = knocks() + button_clicks()
    mix = fan() + hands() + sharp + thumps() + how_loud(-18.5) * room(sharp) + rumble_and_hiss()
    return np.tile(mix, (2, 1))  # two equal channels


def top_cut(x):
    """Nothing passes above the cut-off."""
    return signal.sosfilt(signal.butter(12, 16480, fs=SR, output="sos"), x)


def record(dry):
    """The recorder keeps nothing above its band limit."""
    top_hz = 15800
    mix = np.array([filtered(x, lambda hz: hz < top_hz) for x in dry])
    return top_cut(mix)


dry = scene()
out = record(dry)
to_wav(out)
```